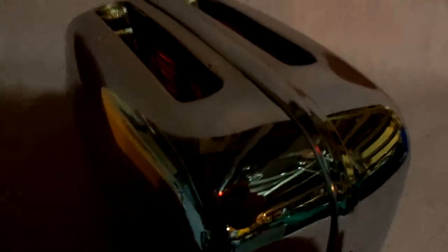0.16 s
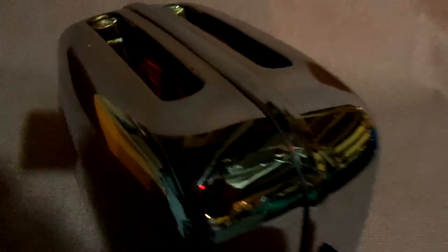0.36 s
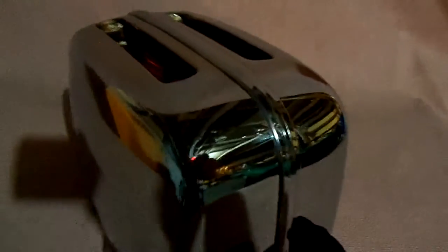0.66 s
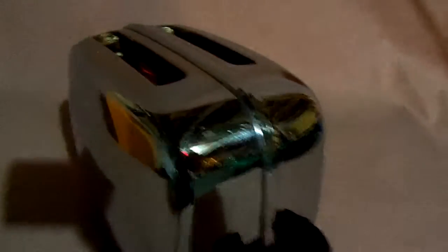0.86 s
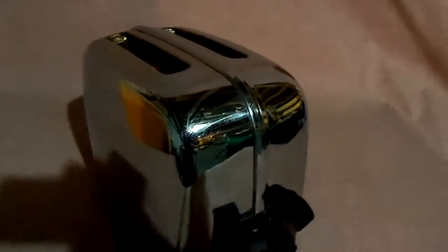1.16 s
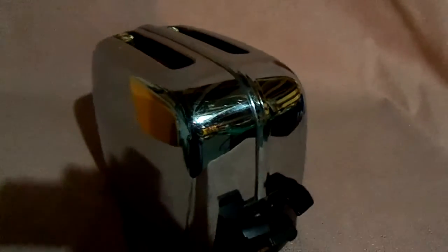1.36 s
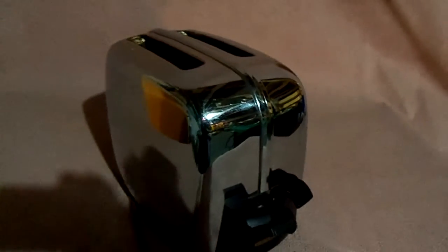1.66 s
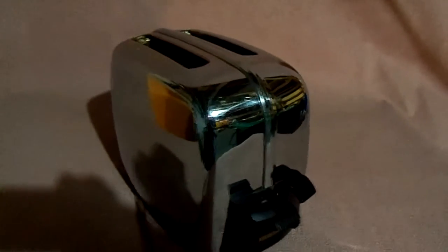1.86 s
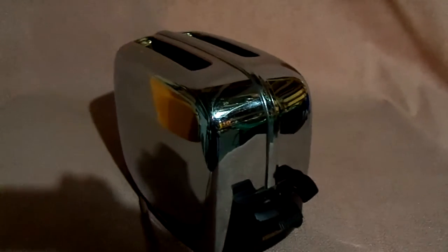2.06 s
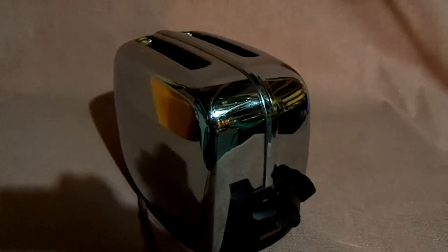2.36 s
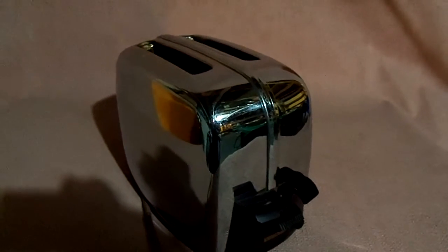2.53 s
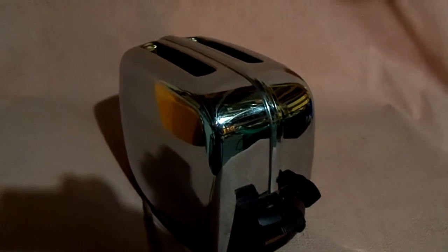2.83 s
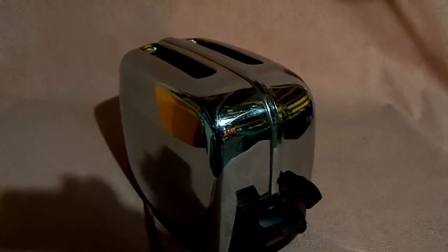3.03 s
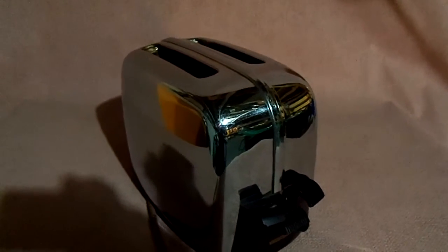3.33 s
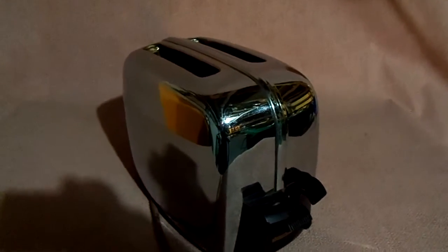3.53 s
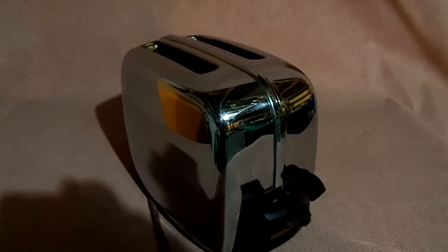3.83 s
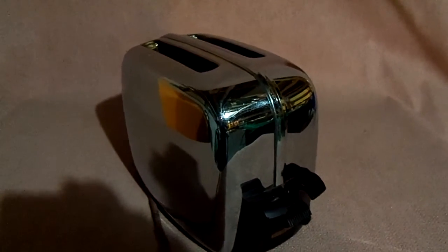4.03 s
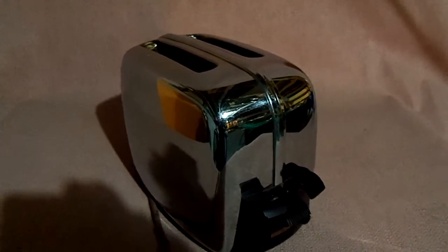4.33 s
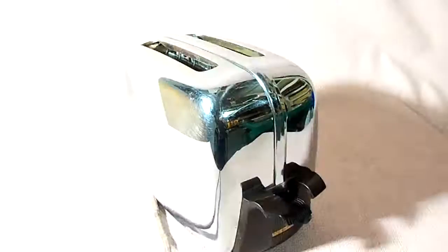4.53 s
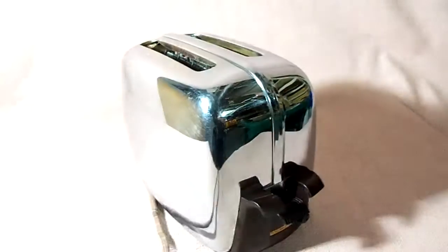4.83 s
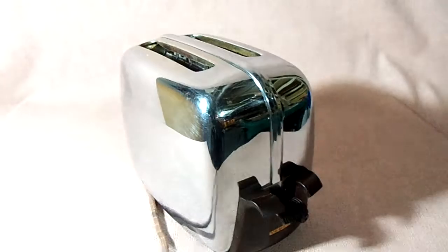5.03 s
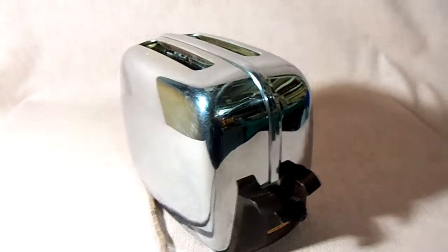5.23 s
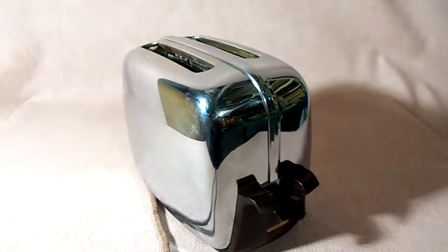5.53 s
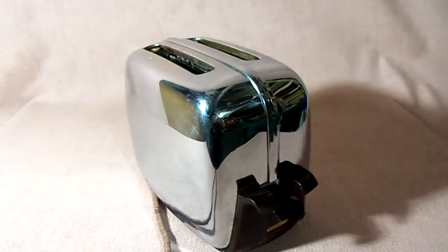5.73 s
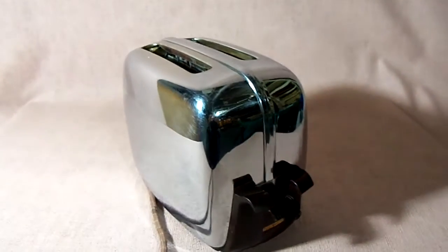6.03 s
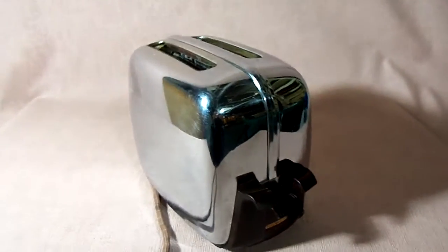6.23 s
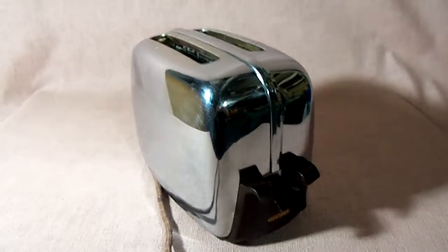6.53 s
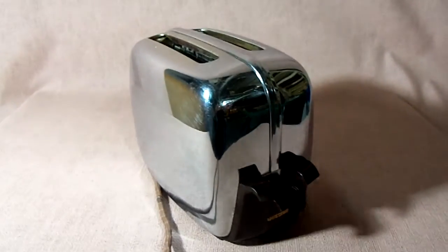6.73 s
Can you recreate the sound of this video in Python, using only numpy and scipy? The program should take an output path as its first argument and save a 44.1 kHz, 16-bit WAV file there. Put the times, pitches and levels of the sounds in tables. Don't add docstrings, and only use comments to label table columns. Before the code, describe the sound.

Close to a metal toaster in a small kitchen, a small camera microphone gives steady soft hiss and faint hum. Light hollow ticks and a brief weakening stutter come first, then stronger metal knocks in the middle. After a pause the latch releases with one loud, bright, springy clack and a very short room tail. The hiss drops lower, and a few dry finger taps and a tiny rub end it.

```python
import sys
import numpy as np
from scipy import signal
from scipy.fft import rfft, irfft, next_fast_len
from scipy.io import wavfile
from scipy.ndimage import uniform_filter1d

SR = 44100
rng = np.random.default_rng(int(sys.argv[2]) if len(sys.argv) > 2 else 0)


def field_ratio(decibels):
    return 10 ** (np.asarray(decibels, dtype=float) / 20)


def digitize_waveform(pressure):
    field = np.atleast_2d(pressure).T
    bounded = np.clip(field, -1, 1)
    quanta = np.round(bounded * 32767).astype(np.int16)
    wavfile.write(sys.argv[1], SR, quanta)


N = 303482
EDGE_HZ = 14020


def rms_one(x):
    return x / np.sqrt(np.mean(x ** 2) + 1e-30)


def peak_one(x):
    return x / np.sqrt(np.max(uniform_filter1d(x ** 2, size=176)) + 1e-30)


def at_hz(points, hz):
    table_hz, values = np.array(points).T
    return np.interp(np.log(hz), np.log(table_hz), values)


def noise_like(t):
    return rng.standard_normal(len(t))


def seconds(length):
    return np.arange(round(length * SR)) / SR


def colour(x, spectrum):
    size = next_fast_len(len(x))
    hz = np.maximum(np.arange(size // 2 + 1) * SR / size, 1)
    return irfft(rfft(x, size) * field_ratio(at_hz(spectrum, hz)), size)[:len(x)]


def band_pass(x, low, high):
    return signal.sosfilt(signal.butter(2, [low, high], "band", fs=SR, output="sos"), x)


def fade(t, t60):
    return field_ratio(-60 * t / t60)


def add(out, s, x):
    i = round(s * SR)
    out[i:i + len(x)] += x[:N - i]


def slip(t, length, grain_db):
    sizes = noise_like(t) * field_ratio(grain_db * rng.exponential(1, len(t)))
    run = sizes * (1 - np.exp(-t / 0.00066)) * np.exp(-t / max(length, .0003))
    return run / np.sqrt(np.sum(run ** 2))


def ring(push, modes, spread_db):
    out = 0
    chances = rng.standard_normal(len(modes))
    for k, ((hz, db, t60), chance) in enumerate(zip(modes, chances)):
        r = field_ratio(-60 / (max(t60, .005) * SR))
        w = 2 * np.pi * hz / SR
        mode = signal.lfilter([0, np.sin(w)], [1, -2 * r * np.cos(w), r * r], push)
        out = out + (-1) ** k * field_ratio(db + spread_db * chance) * mode
    return out


def body(push, modes):
    fed = band_pass(push, modes[0][0] / 1.22, modes[-1][0] * 1.2)
    return peak_one(ring(fed, modes, spread_db=2.5))


# pitch in Hz, level in dB per Hz.
HISS_COLOUR = [(12, -33.5), (20, 1), (125, -3), (301, -7.5), (336, -9), (1360, -22), (7010, -30.5),
               (7820, -28), (8730, -30.5), (12800, -31), (13900, -33)]
# pitch in Hz, level in dB rms.
MAINS_HUM = [(30, -57.5), (60, -64), (120, -61.5)]
HISS_DB = -45
WHINE_HZ, WHINE_STEP_HZ, WHINE_DB, WHINE_OUTER_DB = 7822.4, 29.9, -73.5, -8.5


def electronics():
    t = np.arange(N) / SR
    edge = [(EDGE_HZ, HISS_COLOUR[-2][1]), (EDGE_HZ + 50, -80)]
    out = field_ratio(HISS_DB) * rms_one(colour(noise_like(t), HISS_COLOUR[:-1] + edge))
    whine = [(WHINE_HZ + k * WHINE_STEP_HZ, WHINE_DB + WHINE_OUTER_DB * outer)
             for k, outer in enumerate([1, 0, 0, 1])]
    for hz, db in MAINS_HUM + whine:
        out += field_ratio(db) * np.sqrt(2) * np.sin(2 * np.pi * hz * t)
    return out


# start in seconds, peak level in dB, centre pitch in Hz.
FINGER_TICKS = [(.079, -46, 11000), (.636, -40, 14000), (1.400, -43, 10500), (3.24, -51, 11400),
                (3.348, -39, 12400), (3.590, -49, 7000), (5.402, -53, 9000), (5.634, -46, 9000),
                (5.975, -50, 9600), (6.239, -43.5, 8000), (6.317, -46, 11000), (6.331, -47, 7000),
                (6.34, -52, 5000), (6.351, -40, 3560), (6.3512, -42, 12000), (6.3584, -39, 3560),
                (6.358, -37.5, 9000)]
# start in seconds, peak level in dB.
THUMB_TAPS = [
    (6.239, -49),
    (6.325, -49),
    (6.349, -45.5),
    (6.358, -43.5),
]
TICK_S, TICK_WIDTH_HZ, TICK_MAX_OCTAVES = .0024, 5000, 0.8
THUMB_S, THUMB_HZ, THUMB_OCTAVES = 0.0047, 1170, 0.73
RUB_START_S, RUB_END_S, RUB_DB, RUB_SWELL_DB = 6.295, 6.356, -59, 5.5
RUB_GRAINS_PER_S, RUB_LOW_HZ = 1200, 6000


def handling():
    out, t = np.zeros(N), seconds(.08)
    touches = [(s, db, THUMB_HZ, THUMB_OCTAVES, THUMB_S) for s, db in THUMB_TAPS]
    for s, db, hz in FINGER_TICKS:
        octaves = min(TICK_WIDTH_HZ / hz / np.log(2), TICK_MAX_OCTAVES)
        touches.append((s, db, hz, octaves, TICK_S))
    for s, db, hz, octaves, length in touches:
        half = 2 ** (octaves / 2)
        noise = band_pass(noise_like(t), hz / half, min(hz * half, 15500))
        swell = t / max(length * 0.3, .0002)
        add(out, s - .0005, field_ratio(db - 4.0) * peak_one(noise * swell * np.exp(-swell)))

    along = t / (RUB_END_S - RUB_START_S)
    grains = (rng.random(len(t)) < RUB_GRAINS_PER_S / SR) * rng.exponential(1, len(t))
    grip = signal.lfilter([1], [1, -.97], grains)
    high_pass = signal.butter(2, RUB_LOW_HZ, "high", fs=SR, output="sos")
    rub = rms_one(signal.sosfilt(high_pass, grip * noise_like(t)))
    stroke = np.clip(4 * along, 0, 1) * (along < 1)
    add(out, RUB_START_S, field_ratio(RUB_DB + RUB_SWELL_DB * along) * stroke * rub)
    return out


# start in seconds, then levels in dB of the hollow knock's peak,
# the panel ring, the deep knock and the tail.
SHELL_SLIPS = [(0.246, -37.5, -52, -49, -1), (0.2838, -44, -42, -47, -3), (0.3653, -45, -57, -57, -1),
               (0.4888, -46, -55, -48.5, 4), (0.5427, -38.5, -52, -47, 5), (0.634, -49, -46.5, -57, 4),
               (0.7332, -56, -50.5, -50, -3), (0.7652, -40, -57, -56, -4), (2.1274, -17.5, -32, -33, -9),
               (2.1378, -25.5, -31, -36, -7), (2.2541, -26, -44.5, -40, -7),
               (2.5222, -28.5, -34, -39, -8.5), (2.6214, -36, -38.5, -38, -5), (2.6604, -41, -51, -46, -8),
               (2.6865, -43.5, -52, -50, -5), (2.8786, -35.5, -46, -40.5, -7),
               (5.6318, -41.5, -55, -51, -6)]
STUTTER_S, STUTTER_GAP_S, STUTTER_SLOWING = .834, .03, 1.1
STUTTER_DB, STUTTER_LOSS_DB = -40, 2
STUTTER_PANEL_DB, STUTTER_DEEP_DB, STUTTER_TAIL_DB = -13, -49, -8


def creak_rows():
    gaps = STUTTER_GAP_S * STUTTER_SLOWING ** np.arange(4)
    times = STUTTER_S + np.append(0, np.cumsum(gaps))
    levels = STUTTER_DB - STUTTER_LOSS_DB * np.arange(len(times))
    stutter = [(s, db, db + STUTTER_PANEL_DB, STUTTER_DEEP_DB, STUTTER_TAIL_DB)
               for s, db in zip(times, levels)]
    return SHELL_SLIPS + stutter


# pitch in Hz, level in dB, time to die by 60 dB in seconds.
HOLLOW_MODES = [(1410, -6.5, .035), (1533, -1, 0.021), (1623, -3.5, 0.034), (1698, -3, 0.042),
                (1790, -2, 0.033), (1892, -4, 0.025), (2000, -9, 0.052)]
# pitch in Hz, level in dB, time to die by 60 dB in seconds.
DEEP_MODES = [(1010, -11, 0.035), (1054, -3, 0.04), (1200, -1, 0.042), (1300, -4.5, 0.027)]
# pitch in Hz, level in dB, time to die by 60 dB in seconds.
PANEL_MODES = [(2340, -16, .02), (2690, -2.5, 0.023), (3050, 0, 0.019), (3410, 1, .025), (3650, 0, 0.069),
               (3770, 0, 0.078), (3890, -2, 0.035), (4160, -2, .03), (4440, -8, 0.022), (5060, 2.5, 0.022)]
# pitch in Hz, level in dB per Hz.
CRACK_COLOUR = [(2500, -0.5), (4000, 0), (6500, 0.5), (8000, -2.5), (10000, -7), (14000, -13),
                (16000, -29.5)]
CRACK_OVER_PANEL_DB = 0.47


def creaks():
    out, t = np.zeros(N), seconds(.4)
    for s, knock_db, panel_db, deep_db, tail_db in creak_rows():
        echo = noise_like(t) * fade(t, 0.26) * (1 - np.exp(-t / 0.011)) * field_ratio(tail_db - 26)
        push = slip(t, 0.003, grain_db=1.3) + echo
        knock = field_ratio(knock_db - 6.5) * body(push, HOLLOW_MODES)
        deep = field_ratio(deep_db - 5.0) * body(push, DEEP_MODES)
        panel = field_ratio(panel_db - 5.5) * body(push, PANEL_MODES)
        dying = np.exp(-t / 0.0023) + field_ratio(tail_db + 8) * fade(t, 0.256)
        shape = (1 - np.exp(-t / 0.00029)) * dying
        bright = peak_one(shape * colour(noise_like(t), CRACK_COLOUR))
        crack = field_ratio(panel_db + CRACK_OVER_PANEL_DB - 1.3) * bright
        add(out, s - .001, knock + deep + panel + crack)
    return out


# start in seconds, blow in dB.
LATCH_BLOWS = [
    (4.4298, -20.5),
    (4.4312, -16.5),
    (4.433, -13),
    (4.4348, -15),
    (4.4363, -18.5),
    (4.442, -29),
    (4.448, -34),
]
# pitch in Hz, level in dB, time to die by 60 dB in seconds.
CARRIAGE_MODES = [(970, -26, .1), (1055, -20.5, 0.055), (1518, -18.5, 0.09), (2842, -25.5, 0.074),
                  (3098, -17, 0.062), (3726, -20, 0.081), (4190, -22.5, .06), (4690, -14, .06),
                  (5240, -24.5, 0.046), (5970, -6, .035), (6060, 2, 0.04), (6160, -16, 0.13),
                  (7080, -14, 0.027), (7575, -13.5, 0.07), (8120, -10, 0.048), (8414, -14, .05),
                  (9040, -9.5, .04)]
# pitch in Hz, level in dB, time to die by 60 dB in seconds.
SPRING_MODES = [(10500, -7.5, 0.042), (11100, -15.5, .04), (11300, -7, .04), (11470, -6.5, 0.039),
                (12400, -8, .04), (12270, -5, 0.056), (12640, -16, 0.035), (14050, -4.5, .04)]
# pitch in Hz, level in dB per Hz.
CLACK_COLOUR = [(59, -45), (100, -15.5), (260, -18), (2120, -17), (2970, -12), (3520, -21.5), (4540, -4.5),
                (5490, -6.5), (6100, 0), (9730, -9.5), (12500, -2.5), (13900, -14), (15800, -43.5)]
# pitch in Hz, time to die by 60 dB in seconds.
KITCHEN_TAIL = [(300, 0.18), (1500, .2), (4000, .17), (8000, 0.16), (14000, .12)]
SCRAPE_S = 0.0018


def clack():
    out, t = np.zeros(N), seconds(.5)
    for s, blow_db in LATCH_BLOWS:
        push = slip(t, SCRAPE_S, grain_db=3.0)
        scrape = colour(noise_like(t), CLACK_COLOUR) * (1 - np.exp(-t / 0.0001)) * np.exp(-t / SCRAPE_S)
        carriage = ring(push, CARRIAGE_MODES, spread_db=0.5)
        springs = field_ratio(-1.0) * ring(push, SPRING_MODES, spread_db=3.0)
        add(out, s, field_ratio(blow_db) * (carriage + springs + field_ratio(16) * scrape))

    rise = 1 - np.exp(-t / 0.0052)
    rattle = noise_like(t) * rise * fade(t, 0.22)
    add(out, LATCH_BLOWS[2][0], field_ratio(-53) * ring(rattle, CARRIAGE_MODES, spread_db=2.5))

    edges = 200 * 2 ** np.arange(0, 6.6, .5)
    for low, high in zip(edges, edges[1:]):
        hz = np.sqrt(low * high)
        tail = band_pass(noise_like(t), low, high) * rise * fade(t, at_hz(KITCHEN_TAIL, hz))
        add(out, LATCH_BLOWS[1][0], field_ratio(at_hz(CLACK_COLOUR, hz) - 13.0) * tail)
    return out


# start in seconds, level in dB, length in seconds.
CARRIAGE_STOP = (4.4335, -26.5, 0.00097)


def thud():
    s, db, length = CARRIAGE_STOP
    out, t = np.zeros(N), seconds(.05)
    add(out, s, field_ratio(db) * t / length * np.exp(1 - t / length))
    return out


GAIN_DB, DUCK_S, DUCK_DB, DUCK_TIME_S = 1, 4.44, -8, 0.04


def scene():
    since = np.maximum(np.arange(N) / SR - DUCK_S, 0)
    gain = field_ratio(GAIN_DB + DUCK_DB * (1 - np.exp(-since / DUCK_TIME_S)))
    return (gain * electronics() + handling() + creaks() + clack() + thud())[None]


def low_pass(x):
    return signal.sosfilt(signal.butter(12, 15990, fs=SR, output="sos"), x)


def record(dry):
    x = dry / (1 + (np.abs(dry) / .74) ** 4) ** .25
    hz = np.arange(N // 2 + 1) * SR / N
    below = irfft(rfft(x) * (hz < EDGE_HZ), N)
    top_slope = np.clip((16000 - hz) / 1200, 0, 1)
    above = irfft(rfft(x) * (hz >= EDGE_HZ) * top_slope, N)
    power = uniform_filter1d(above ** 2, size=256)
    sudden = power > 1.5 * uniform_filter1d(power, size=1024) + field_ratio(-140)
    kept = uniform_filter1d(sudden * 1., size=128)
    return low_pass(below + field_ratio(-5.5) * kept * above)


dry = scene()
out = record(dry)
digitize_waveform(out)
```